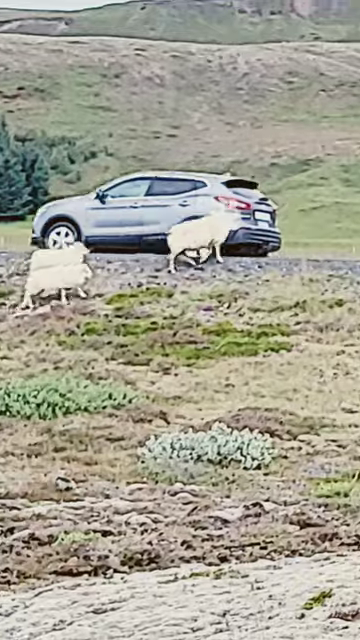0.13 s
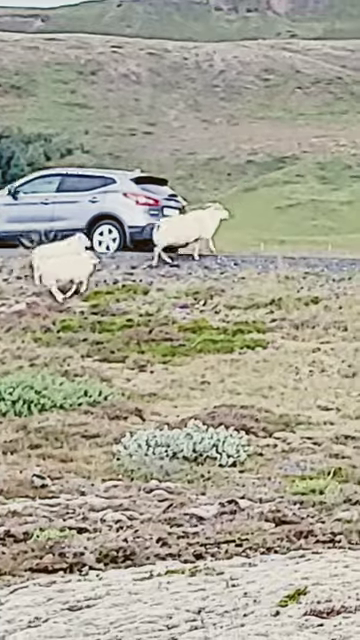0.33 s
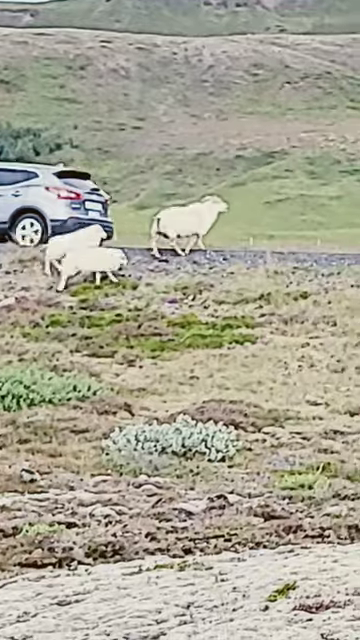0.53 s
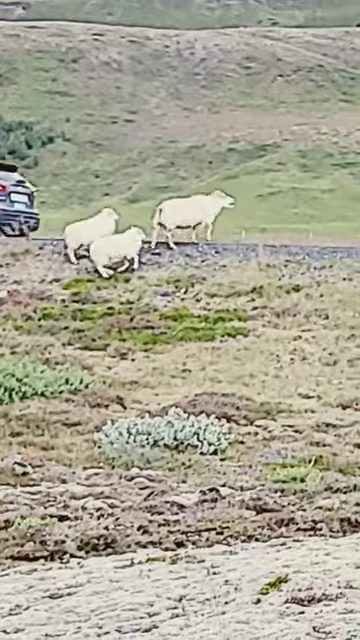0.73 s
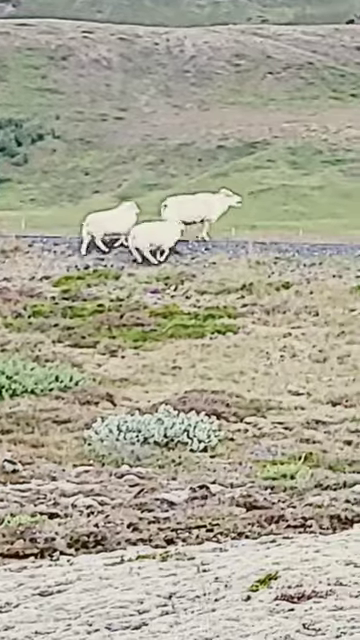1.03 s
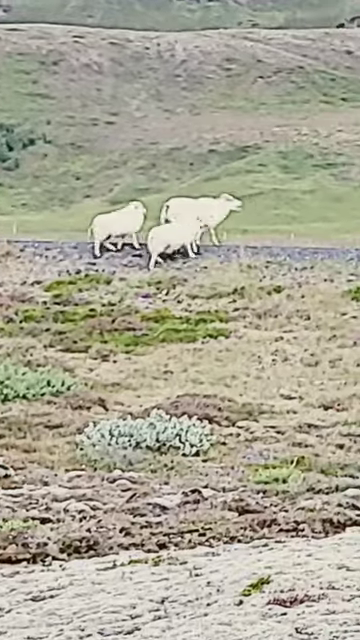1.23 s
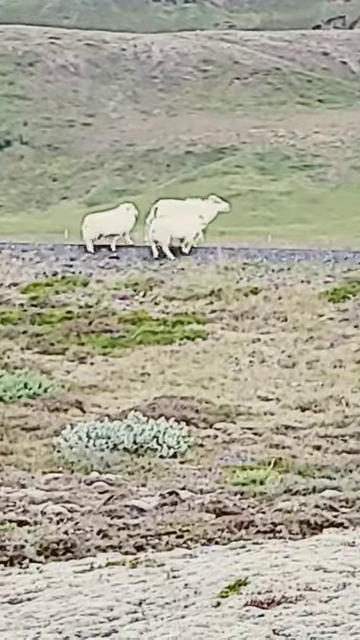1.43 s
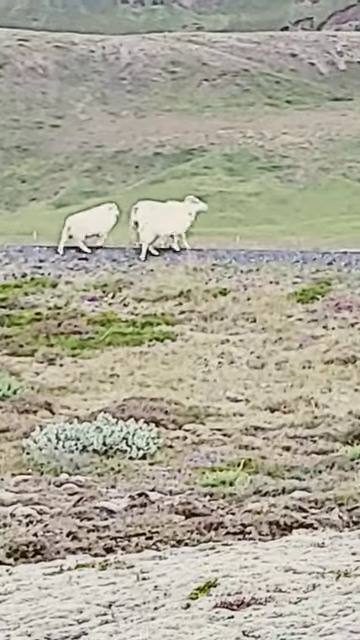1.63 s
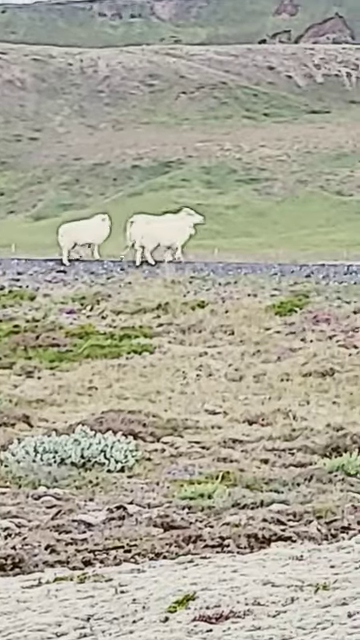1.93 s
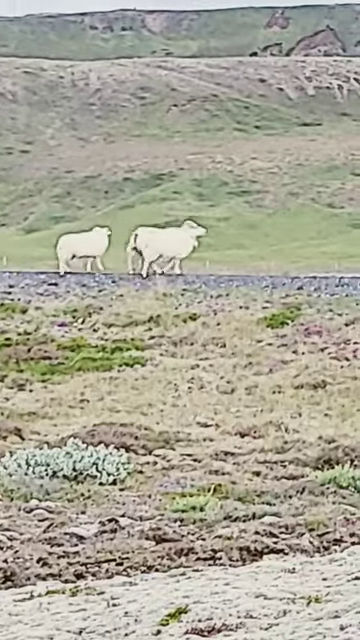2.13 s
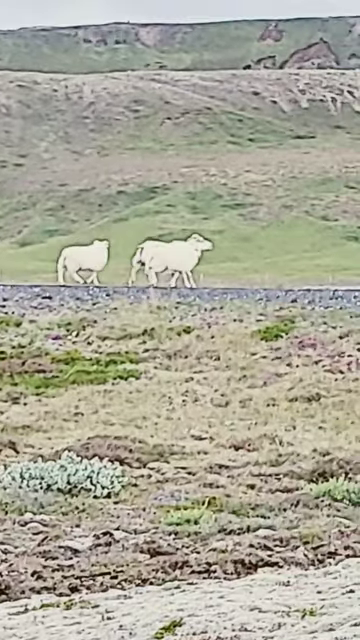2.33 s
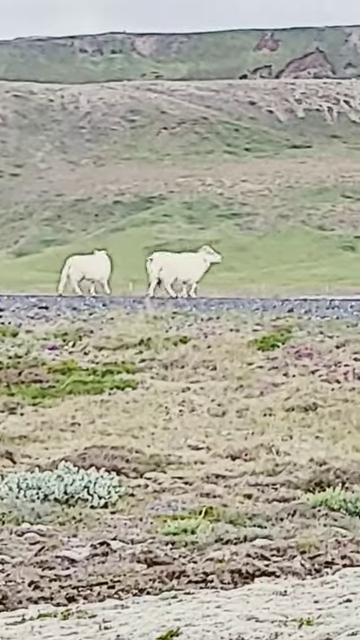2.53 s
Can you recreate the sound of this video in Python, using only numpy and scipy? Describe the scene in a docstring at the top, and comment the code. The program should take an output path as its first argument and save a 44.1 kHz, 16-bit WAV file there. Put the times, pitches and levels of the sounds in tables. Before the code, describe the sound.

A sheep bleats once, creaky and pulsing, some way off beside a windy road.

```python
"""A sheep bleats once, some way off beside a road: a creaky voice chopped into short runs of throat pulses.
Each pulse is a click with a puff of noise that sets throat and mouth ringing; the ground echoes it.
A car's dull tyre noise and a hiss, partly of the microphone itself, are noise whose bands flicker.
Wind thumps and flutters as lumpy low noise on the two ports of a handheld microphone.
A few sharper buffets are short bursts of a low tone."""
import sys
import numpy as np
from scipy import signal
from scipy.fft import rfft, irfft
from scipy.io import wavfile
from scipy.ndimage import uniform_filter1d

SR = 44100
rng = np.random.default_rng(int(sys.argv[2]) if len(sys.argv) > 2 else 0)


def to_wav(sig):
    """Store sig (one row per channel, or 1-D mono) as 16-bit WAV at the path in sys.argv[1].

    Samples outside -1..1 are clipped; the rate is SR.
    """
    pcm = np.clip(np.atleast_2d(sig), -1, 1) * 32767
    pcm = np.round(pcm).astype(np.int16)
    wavfile.write(sys.argv[1], SR, pcm.T)  # frames by channels


def decibels_to_gain(level_db):
    """Convert a level in decibels to a linear amplitude gain (20 dB per decade)."""
    exponent = np.asarray(level_db, float) / 20
    return 10 ** exponent


N = 119070  # length in samples


def at_hz(points, hz):
    """Reads a table of frequency and value, with frequency on a log axis as in hearing."""
    table_hz, value = np.transpose(points)
    return np.interp(np.log(hz + 1), np.log(table_hz), value)


def rms_one(x):
    """Scales a signal to an average strength (rms) of 1."""
    return x / np.sqrt(np.mean(x ** 2, axis=-1, keepdims=True) + 1e-20)


def in_time(rows):
    """Turns rows that start with a time into one curve per column, with straight lines between rows."""
    seconds, *columns = np.transpose(rows)
    return [np.interp(np.arange(N) / SR, seconds, column) for column in columns]


def drift(rate, channels=2):
    """Slow random wandering of spread 1: filtered noise; a higher rate (per second) wanders faster."""
    step = 40  # samples between the slow values
    r = np.exp(-2 * np.pi * step * rate / SR)
    noise = rng.standard_normal((channels, N // step + 1002))
    slow = signal.lfilter([1], [1, -2 * r, r * r], noise)
    slow = rms_one(slow[:, 1000:])  # skip the filter's start
    return np.array([np.interp(np.arange(N) / step, np.arange(len(v)), v) for v in slow])


def patchy_noise(spectrum, patchy_db, rate, channels=2):
    """Coloured noise of rms 1 whose half-octave bands each flicker, partly together."""
    hz = np.fft.rfftfreq(N, 1 / SR)
    coloured = rfft(rng.standard_normal((channels, N))) * decibels_to_gain(at_hz(spectrum, hz))
    place = 2 * np.log2(hz + 1)  # in half octaves
    lowest, highest = 2 * np.log2(np.array(spectrum)[[0, -1], 0])
    together = drift(rate / 3, channels=1)
    total = 0
    for k in range(int(lowest), int(highest) + 2):
        band = irfft(coloured * np.sqrt(np.clip(1 - abs(place - k), 0, 1)), N)
        flicker = 0.26 * together + drift(rate, channels=1)
        total = total + band * decibels_to_gain(patchy_db * flicker)
    return rms_one(total)


def ring(x, hz, width_hz):
    """A resonance: a unit click sets a sine of height 1 ringing; a wider one dies away sooner."""
    r, w = np.exp(-np.pi * width_hz / SR), 2 * np.pi * hz / SR
    return signal.lfilter([0, np.sin(w)], [1, -2 * r * np.cos(w), r * r], x)


# Levels of tyres and hiss. Each row: time in seconds, tyre level in dB before its boost,
# broad hiss level in dB before its boost, narrow hiss level in dB.
ROAD_LEVELS = [(.08, -62.5, -72, -94.5), (.3, -62.5, -70, -86), (.55, -60, -67, -80),
               (.63, -63, -69.5, -82), (.9, -57, -69, -86), (1.2, -59.5, -68, -89), (1.5, -56, -68, -84),
               (1.7, -60, -71, -78), (1.85, -57, -69.5, -71.5), (2.05, -61, -71.5, -76),
               (2.15, -60.5, -69.5, -74), (2.3, -60.5, -70, -82), (2.5, -61, -71.5, -93),
               (2.7, -64.5, -75.5, -91)]
# Colour of the three noises. Each row: frequency in Hz, relative level in dB per Hz.
TYRE_COLOUR = [(220, -47), (380, -12), (499, -9), (525, -7), (707, 0), (776, -0.5), (1010, 1.5), (1160, -4),
               (1520, -9.5), (1680, -12.5), (1910, -6), (2080, -5), (2900, -25), (3770, -62.5),
               (6380, -120)]
HISS_COLOUR = [(1590, -43.5), (2700, -8.5), (2910, -10.5), (3850, -12), (4390, -14.5), (4940, -15.5),
               (6450, -18), (7700, -17), (8850, -19), (9600, -27.5), (10300, -22), (11100, -29),
               (13300, -27), (14900, -23), (15700, -34)]
NARROW_COLOUR = [(2900, -40), (3250, -7.5), (3600, -1), (3950, 4), (4150, -9), (4500, -37)]


def road():
    """Tyre roar and a hiss, partly of the microphone itself; row 0 is alike at both ports, 1 and 2 not."""
    tyre_boost_db, hiss_boost_db = 7, 0.5
    tyre_alike, hiss_alike = 0.88, 0.26  # share of the power that is alike at both ports
    tyre_db, hiss_db, narrow_db = in_time(ROAD_LEVELS)
    tyres = decibels_to_gain(tyre_db + tyre_boost_db) * patchy_noise(TYRE_COLOUR, 2.52, 16.7, channels=3)
    hiss = decibels_to_gain(hiss_db + hiss_boost_db) * patchy_noise(HISS_COLOUR, 1.8, 1.5, channels=3)
    hiss = hiss + decibels_to_gain(narrow_db) * patchy_noise(NARROW_COLOUR, 1.3, 6.7, channels=3)

    def shared(noise, alike):
        return noise * np.sqrt([[alike], [1 - alike], [1 - alike]])

    return shared(tyres, tyre_alike) + shared(hiss, hiss_alike)


# Wind on each port. Each row: time in seconds, thump level in dB, flutter level in dB.
LEFT_GUSTS = [(0.097, -40, -42.5), (0.105, -45, -47), (0.142, -27.5, -48), (0.262, -30, -43.5),
              (0.277, -61, -58), (0.307, -46, -51), (0.337, -33.5, -61), (0.419, -37, -64),
              (0.449, -35, -49), (0.464, -43.5, -50), (0.524, -23, -40.5), (0.539, -59, -57),
              (0.561, -31.5, -59), (0.629, -58, -65), (0.651, -41.5, -64), (0.688, -48, -64),
              (0.726, -31, -66), (0.771, -56, -76), (0.801, -31, -68), (0.89, -27, -56), (0.92, -34.5, -67),
              (0.95, -33.5, -44.5), (1.018, -30, -39), (1.04, -36.5, -59), (1.055, -35.5, -29),
              (1.078, -19, -42), (1.093, -47, -68), (1.122, -52, -54.5), (1.182, -31.5, -51),
              (1.22, -44, -57), (1.235, -40, -61), (1.28, -24, -55), (1.31, -46, -45), (1.339, -16, -43),
              (1.354, -50, -55.5), (1.399, -20.5, -51), (1.437, -44, -39), (1.467, -23, -34),
              (1.534, -36, -52), (1.579, -30, -52), (1.646, -36.5, -47), (1.676, -24, -53.0),
              (1.736, -36, -52), (1.773, -32.5, -65), (1.796, -38, -69), (1.886, -31.5, -74),
              (1.931, -58, -83), (1.946, -42.5, -84), (2.058, -59.5, -81), (2.095, -54, -79),
              (2.11, -38, -76), (2.155, -30.5, -58), (2.222, -59, -74), (2.252, -36.5, -75),
              (2.297, -42, -69), (2.357, -23, -37), (2.424, -35.5, -65), (2.439, -43, -74),
              (2.544, -51.5, -71), (2.597, -42.5, -75), (2.641, -52, -85), (2.694, -42, -82)]
RIGHT_GUSTS = [(0.097, -34.5, -48), (0.142, -27.5, -49), (0.18, -27, -44), (0.202, -29.5, -45),
               (0.262, -37.5, -54), (0.284, -23.5, -44), (0.299, -39, -57), (0.314, -71, -48),
               (0.337, -35.5, -51), (0.419, -48, -50), (0.434, -31, -57), (0.479, -46, -56),
               (0.516, -28.5, -52), (0.599, -47.5, -69), (0.644, -68, -72), (0.688, -68, -62.0),
               (0.703, -47, -62), (0.741, -34.5, -56.5), (0.756, -87, -84), (0.801, -35, -40),
               (0.861, -29, -62), (0.89, -31, -44), (0.928, -41, -51), (1.01, -28, -43.5), (1.04, -34, -46),
               (1.085, -21.5, -48), (1.115, -50, -53), (1.137, -35.5, -75), (1.16, -43, -53),
               (1.182, -30, -64), (1.22, -50, -67), (1.235, -31, -49), (1.295, -35.5, -43),
               (1.31, -46.5, -49), (1.324, -20, -34.5), (1.369, -41, -45), (1.392, -25, -53),
               (1.407, -20, -51), (1.422, -57, -37), (1.437, -58, -51.5), (1.459, -21, -28.5),
               (1.489, -31.5, -42.5), (1.504, -60, -47.5), (1.534, -46, -47), (1.594, -28.5, -49),
               (1.631, -70, -44.5), (1.654, -74, -49), (1.684, -30.5, -42.5), (1.699, -47, -48.5),
               (1.721, -85, -53), (1.751, -34.5, -42), (1.773, -48, -52), (1.788, -66, -52),
               (1.833, -41, -53), (1.856, -46, -46), (1.871, -26, -47), (1.886, -38.5, -53),
               (1.901, -77, -56), (1.931, -94, -60), (1.983, -83, -52), (2.095, -98, -73),
               (2.125, -64, -51), (2.14, -40.5, -58.5), (2.17, -36, -45.5), (2.215, -88, -62),
               (2.267, -78, -40), (2.297, -81, -67), (2.312, -57, -42.5), (2.357, -34, -40.5),
               (2.424, -37.5, -50), (2.447, -96, -56.5), (2.567, -95, -63.5), (2.641, -89, -50.5),
               (2.694, -83, -71)]
# Colour of the wind noise. Each row: frequency in Hz, relative level in dB per Hz.
THUMP_COLOUR = [(12, -39), (25, -12.5), (45, 2.5), (65, 3.5), (90, 4), (130, -6), (190, -10.5), (260, -21),
                (400, -65), (700, -110)]
LEFT_FLUTTER = [(100, -49), (170, -5), (250, 1.5), (330, -7), (430, -15.5), (600, -57), (900, -57.5),
                (1500, -100)]
RIGHT_FLUTTER = [(100, -48), (180, -16.5), (250, -6.5), (320, 0), (430, -7), (600, -14.5), (900, -26),
                 (1500, -100)]


def wind():
    """Lumpy low noise, its own at each port, with a higher flutter of small eddies."""
    lumps_per_s, thump_lump_db, flutter_lump_db = 25, 2, 3.5
    even_s = 0.044  # the noise's own swells are levelled over about this time
    hz, out = np.fft.rfftfreq(N, 1 / SR), np.zeros((2, N))
    for port, (gusts, flutter) in enumerate(((LEFT_GUSTS, LEFT_FLUTTER), (RIGHT_GUSTS, RIGHT_FLUTTER))):
        lumps = drift(lumps_per_s, channels=1)[0]
        thump_db, flutter_db = in_time(gusts)
        for colour, db, lump_db in ((THUMP_COLOUR, thump_db, thump_lump_db),
                                    (flutter, flutter_db, flutter_lump_db)):
            noise = irfft(rfft(rng.standard_normal(N)) * decibels_to_gain(at_hz(colour, hz)), N)
            swell = uniform_filter1d(noise ** 2, int(even_s * SR))
            swell = uniform_filter1d(swell, int(even_s * SR / 2)) + 1e-20
            even = noise / np.sqrt(swell)
            out[port] += decibels_to_gain(db) * rms_one(even * decibels_to_gain(lump_db * lumps))
    return out


# Sharp buffets on the ports. Each row: start in seconds, level in dB before its boost,
# frequency in Hz, left level minus right level in dB.
BUFFET_ROWS = [(.206, -30.5, 167, -7), (2.255, -43, 330, -17.5), (2.294, -48, 404, -11),
               (2.328, -41, 420, -12), (2.356, -31.5, 203, -12)]


def buffets():
    """Each buffet is a few cycles under a bell-shaped swell, with a random phase at each port."""
    length_cycles, boost_db = 2.48, 8
    out, t = np.zeros((2, N)), np.arange(N) / SR
    side = np.array([[.5], [-.5]])
    for start, db, hz, pan_db in BUFFET_ROWS:
        phase = rng.random((2, 1))
        cycles = (t - start) * hz - length_cycles / 2
        bell = np.exp(-(5.1 * cycles / length_cycles) ** 2)
        out += decibels_to_gain(db + boost_db + pan_db * side) * bell * np.sin(2 * np.pi * (cycles + phase))
    return out


# Phase between the ports. Each row: frequency in Hz, radians by which the left leads.
LEFT_LEAD = [(600, 0.17), (1200, 0.15), (1980, 1.1), (2400, 1.06), (2840, 2.5), (3960, 3.22), (6030, 7.33),
             (12000, 20)]
# Balance of the ports. Each row: frequency in Hz, left level minus right level in dB.
LEFT_TILT = [(400, 0), (740, 0.7), (1220, -3), (2010, -3.5), (2600, -5.5), (3330, 6.5), (5500, 5),
             (9080, -1), (15000, -3.5)]


def ports(alike, apart):
    """The housing shifts phase and level between the two ports, by frequency."""
    hz, side = np.fft.rfftfreq(N, 1 / SR), np.array([[.5], [-.5]])
    turned = rfft(alike) * np.exp(1j * side * at_hz(LEFT_LEAD, hz))
    return irfft((turned + rfft(apart)) * decibels_to_gain(side * at_hz(LEFT_TILT, hz)), N)


def mouth(t, hz):
    """The mouth's ring swells briefly, dies away and slides up in pitch through hz."""
    level_db, rise_s, width_hz = 5.5, 0.00089, 166
    bend_hz, bend_s = 450, .0016
    turns = (hz + bend_hz / 4) * t + bend_hz * bend_s * np.exp(-t / bend_s)
    swell = (1 - np.exp(-t / rise_s)) * np.exp(-np.pi * width_hz * t)
    return decibels_to_gain(level_db) * swell * np.sin(2 * np.pi * turns)


# Single throat pulses: three creaks before the bleat, two within it. Each row: start in seconds,
# pulse level in dB, mouth resonance in Hz, which the ring slides up through,
# then deep throat, upper throat and rasp levels in dB, added to their resonances' own.
SINGLE_PULSES = [(.7510, -38.5, 2100, -1, -2.5, -20), (.8548, -33.5, 2230, -1, 4.5, -30),
                 (.8742, -31.5, 2180, -6, 3, -33), (1.0500, -40.5, 2130, 8, 12, 7),
                 (1.2395, -31, 2210, 0, 6, -5)]
# Runs of the bleat. Each row: first pulse in seconds, length in seconds, pulses per second (Hz),
# loudest pulse level in dB, mouth resonance in Hz at the loudest point, which the ring slides up through,
# mouth glide in Hz over the run, deep throat, upper throat and rasp levels in dB as above,
# loudest point as a share (0 to 1) of the run.
BLEAT_RUNS = [(1.0304, 0.013, 163.6, -36.5, 2200, 3, 0, 6.5, -4, 0.6),
              (1.06, 0.008, 151.4, -33.5, 2170, 40, 5, 9.5, -1.5, 0.66),
              (1.1308, 0.02, 151.4, -35, 2210, 58, 1, 4.5, -20, 0.7),
              (1.2204, 0.0065, 155, -27.5, 2130, -60, -3.5, 0, 2.5, 0.67),
              (1.2445, 0.014, 145.4, -29.5, 2294, 20, -4, -1, -1, 0.92),
              (1.294, 0.021, 156.5, -40, 2150, -50, -18, 2.5, 7.5, 0.65),
              (1.3265, 0.0215, 149.3, -31.5, 2430, 300, 0, 0.5, 4, 0.56),
              (1.387, 0.014, 160.7, -37, 2360, -150, -6, -6, 4, 0.25),
              (1.4150, 0.030, 140.6, -30, 2280, 132, -8.5, -6.5, 0, 0.82),
              (1.485, 0.024, 139.6, -41, 2180, -400, 3, 1, -1, 0.3),
              (1.515, 0.023, 134, -33, 2370, 250, -16, -19, 1, 0.33),
              (1.548, 0.027, 132, -43, 2050, -100, -17, -19, 2.5, 0.7),
              (1.578, 0.036, 124.8, -32.5, 2307, 280, -16, -13, 1.5, 0.72)]


def pulses():
    """Nearly even runs of pulses swell and fade as the mouth glides: rows as the single pulses."""
    edge_db, jitter_s, spread_db = -7, .0002, 0.5
    rows = list(SINGLE_PULSES)
    for start, length, pitch_hz, db, mouth_hz, glide_hz, *colour_db, top in BLEAT_RUNS:
        for k in range(12):  # at most 12 pulses in a run
            after = k / pitch_hz
            if after > length:
                break
            share = after / length - top
            swell_db = edge_db * (share / (top if share < 0 else 1 - top)) ** 2
            time_chance, level_chance = rng.standard_normal(2)
            rows.append((start + after + jitter_s * time_chance,
                         db + swell_db + spread_db * level_chance,
                         mouth_hz + glide_hz * share, *colour_db))
    return rows


# Resonances, deep then upper throat, and the rasp. Each row: frequency in Hz, width in Hz, level in dB
# before the pulse's own is added.
THROAT_RINGS = [(653, 30, -6.5), (1380, 75, -7.5)]
RASP_RINGS = [(3100, 230, -23), (4846, 166, -29.5), (5560, 410, -27), (6230, 190, -30)]
# Echoes from ground and verge. Each row: delay in seconds, level in dB before dulling.
GROUND_ECHOES = [(.0021, -21), (.0047, -27), (.011, -30), (.023, -24), (.041, -17.5), (.067, -15.5)]


def sheep():
    """Every pulse, a click with a puff of noise, rings throat and mouth; the ground echoes it."""
    breathy, breath_s = .33, .003  # strength and fading time of the puff
    throat_top_hz, voice_top_hz, rasp_spread_db = 2900, 6650, 2
    out, t = np.zeros(N + 4096), np.arange(2048) / SR
    soft = signal.butter(4, throat_top_hz, fs=SR, output="sos")
    for start, db, mouth_hz, *throat_db, rasp_db in pulses():
        puff = rng.standard_normal(len(t)) * np.exp(-t / breath_s) / np.sqrt(breath_s * SR / 2)
        kick = breathy * puff + (t == 0)  # the puff plus a one-sample click
        voice = signal.fftconvolve(kick, mouth(t, mouth_hz))[:len(t)]
        for own_db, (hz, width_hz, ring_db) in zip(throat_db, THROAT_RINGS):
            voice += decibels_to_gain(own_db + ring_db) * ring(kick, hz, width_hz)
        voice = signal.sosfilt(soft, voice)
        for hz, width_hz, ring_db in RASP_RINGS:
            chance_db = rasp_spread_db * rng.standard_normal()
            voice += decibels_to_gain(rasp_db + ring_db + chance_db) * ring(puff + kick, hz, width_hz)
        i = int(start * SR)
        out[i:i + len(t)] += decibels_to_gain(db) * voice
    out = signal.sosfilt(signal.butter(3, [450, voice_top_hz], "band", fs=SR, output="sos"), out)
    dull = signal.sosfilt(signal.butter(1, 3000, fs=SR, output="sos"), out)
    echoes = sum(decibels_to_gain(db) * np.roll(dull, int(delay * SR)) for delay, db in GROUND_ECHOES)
    return (out + echoes)[:N]


def scene():
    """Sheep, road and hiss pass the ports' phase and level shifts; wind and buffets are added straight."""
    far = road()
    return ports(sheep() + far[0], far[1:]) + wind() + buffets()


def band_limit(x):
    """A steep low-pass at the top of the band."""
    return signal.sosfilt(signal.butter(12, 15550, fs=SR, output="sos"), x)


def record(dry):
    """Peaks are rounded softly, and the sound begins after a silent lead-in."""
    overload, start_s = .17, .0812  # level that peaks bend towards (full scale is 1), lead-in in seconds
    rounded = overload * np.tanh(dry / overload)
    mix = rounded * (np.arange(N) >= start_s * SR)
    return band_limit(mix)


dry = scene()
out = record(dry)
to_wav(out)
```